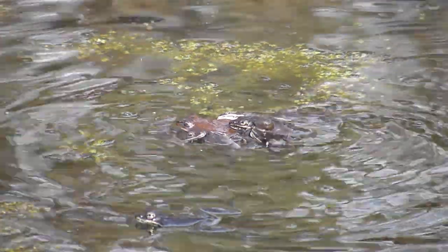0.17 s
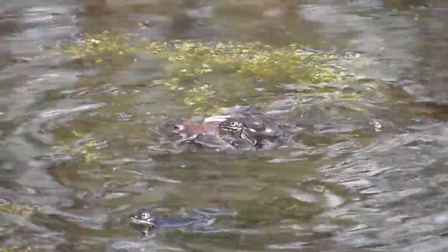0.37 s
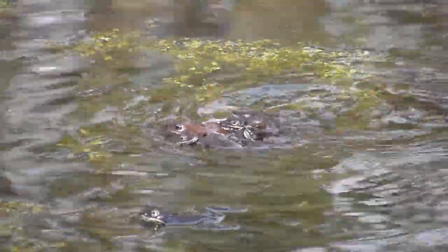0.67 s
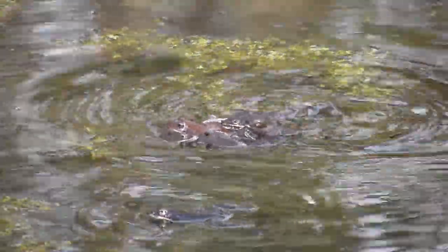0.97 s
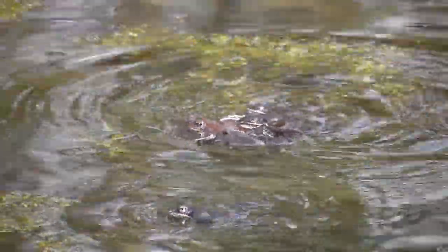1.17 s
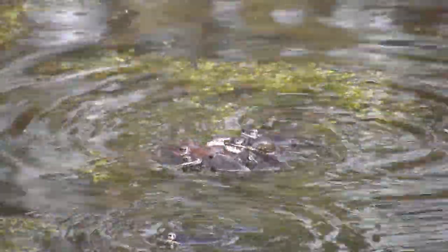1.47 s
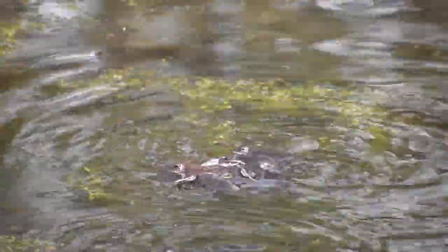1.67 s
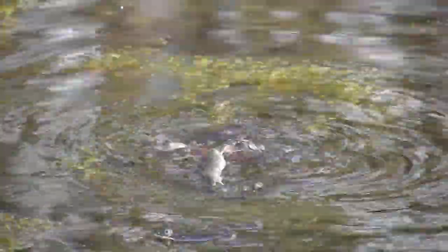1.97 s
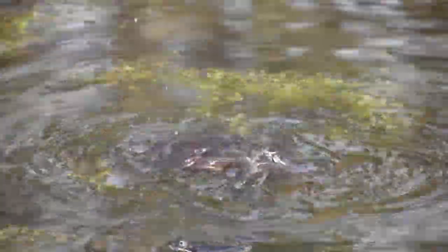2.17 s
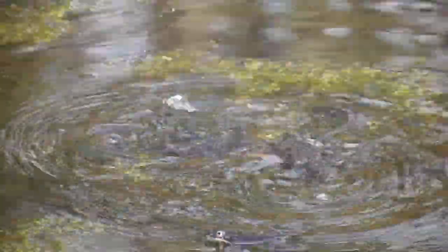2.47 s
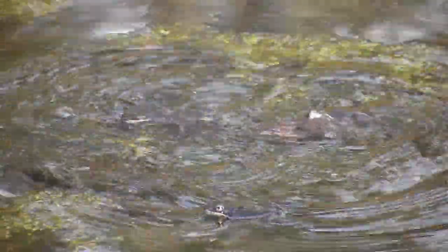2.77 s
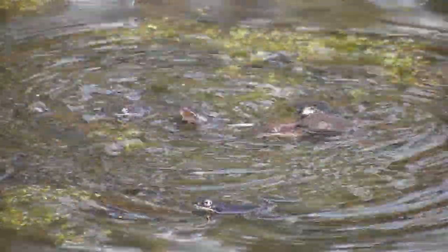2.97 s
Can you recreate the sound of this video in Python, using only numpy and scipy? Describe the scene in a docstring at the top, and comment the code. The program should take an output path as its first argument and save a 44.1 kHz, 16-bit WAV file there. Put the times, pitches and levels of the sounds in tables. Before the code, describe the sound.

After a brief silence a frog chorus cuts in, rapid clucking quacks thinning, clustering densely, then continuing; a faint bird whistles early, one loud click snaps later. Open pond, nearby frogs clear, others distant.

```python
"""Wood frogs quack over one another on a woodland pond: each quack is a short train of vocal pulses,
most often speeding up from slow ticks to a buzz, that rings the throat and swelling vocal sacs.
Farther frogs, weaker and duller, call all along, and filtered noise dying away serves as the woods' echo.
A scuffle adds one snap of decaying sines, two small splashes and soft bumps of noise; a bird whistles
two faint gliding sines, over a steady hiss of coloured noise."""
import sys
import numpy as np
from scipy import signal
from scipy.fft import rfft, irfft
from scipy.io import wavfile

SR = 44100
rng = np.random.default_rng(int(sys.argv[2]) if len(sys.argv) > 2 else 0)


def store_pcm(level_fs):
    """Save levels as 16-bit WAV."""
    pcm = np.round(np.clip(level_fs, -1, 1) * 32767).astype(np.int16)
    wavfile.write(sys.argv[1], SR, np.atleast_2d(pcm).T)


N = 137151

# Near quacks. Each row: loudest moment in seconds, level in dB, rise and fall to half effort in seconds
# (before each ring's own length factor), buzz rate in pulses per second, sac ring in Hz,
# low ring in dB, upper ring in dB and Hz, top ring in dB and Hz; ring levels are relative to the sac ring.
NEAR_QUACKS = [(0.1454, -11.5, 0.007, 0.011, 405, 1556, -6.5, -23.5, 2900, -14.5, 4160),
               (0.197, -24, 0.0058, 0.014, 453, 1840, -5, -11.5, 3100, -13, 4750),
               (0.2726, -18.5, 0.0047, 0.0038, 130, 1480, -1, -18, 3840, -13, 5170),
               (0.3173, -15, 0.007, 0.0057, 420, 1740, -5.5, -15, 2850, -10.5, 5030),
               (0.366, -26.5, 0.016, 0.024, 353, 1526, 0, -16, 3050, -16.5, 5234),
               (0.43, -15, 0.0089, 0.0096, 413, 1430, -4.5, -11.5, 3080, -24, 5070),
               (0.465, -19, 0.018, 0.013, 409, 1232, -4, -11.5, 2300, -17.5, 4600),
               (0.496, -13.5, 0.014, 0.0055, 529, 1650, -14, -17.5, 2580, -24, 4650),
               (0.522, -22, 0.02, 0.011, 268, 1580, 1, -12, 2484, -22, 4730),
               (0.592, -20, 0.016, 0.028, 380, 1480, -6.5, -16.5, 2790, -21, 4600),
               (0.662, -24.5, 0.018, 0.027, 340, 1605, -4.5, -21, 2740, -20, 5430),
               (0.694, -18.5, 0.011, 0.0039, 190, 1660, -0.5, -18, 2900, -10.5, 5050),
               (0.859, -30, 0.013, 0.0087, 388, 1200, 5, -11, 2740, -20, 4770),
               (1.081, -20.5, 0.01, 0.012, 432, 1520, -4.5, -12, 2790, -18, 5570),
               (1.166, -18.5, 0.0079, 0.016, 413, 1620, -9.5, -15, 2890, -18, 4710),
               (1.251, -26, 0.012, 0.0078, 360, 1890, -1.5, -14, 3145, -17.5, 5200),
               (1.297, -21, 0.011, 0.025, 455, 1820, -11, -11, 2980, -15.5, 4720),
               (1.317, -14.5, 0.0092, 0.0085, 376, 1454, -3, -11.5, 2660, -34, 4930),
               (1.401, -18, 0.011, 0.018, 250, 1640, -7, -17, 3620, -19, 5100),
               (1.413, -17.5, 0.011, 0.0074, 540, 1800, -6.5, -7, 3220, -31, 3970),
               (1.459, -13.5, 0.0095, 0.018, 412, 1800, -9, -7.5, 3390, -21.5, 5200),
               (1.482, -14, 0.0099, 0.0058, 472, 1630, -9.5, -6.5, 2500, -26.5, 4800),
               (1.499, -17.5, 0.025, 0.029, 327, 1670, -9.5, -17, 3260, -24, 5460),
               (1.516, -12.5, 0.0022, 0.01, 370, 1650, -2, -9, 2910, -17, 5080),
               (1.5688, -26.5, 0.00082, 0.005, 198, 1450, -2, 3.5, 3080, -30, 4000),
               (1.647, -22.5, 0.014, 0.0047, 380, 1566, -6, -12, 2700, -21, 5200),
               (1.707, -33, 0.011, 0.0061, 372, 1200, 9.5, -44, 3080, -52, 4930),
               (1.798, -25, 0.0059, 0.019, 420, 1677, -16.5, -45, 3050, -10, 4880),
               (1.857, -12.5, 0.017, 0.0092, 404, 1614, -20, -12.5, 2470, -24.5, 4900),
               (1.893, -18.5, 0.016, 0.015, 390, 1570, -12, -13, 2790, -28, 5100),
               (1.977, -23.5, 0.015, 0.0026, 390, 1540, -6.5, -24.5, 2550, -24, 4810),
               (2.039, -17, 0.007, 0.012, 366, 1680, -13.5, -15.5, 2797, -20, 4500),
               (2.155, -16, 0.0035, 0.014, 350, 1770, -9.5, -16, 3080, -17.5, 4820),
               (2.206, -17, 0.0082, 0.011, 454, 1610, -11, -30, 3100, -15.5, 4300),
               (2.234, -23.5, 0.0073, 0.025, 340, 1476, -4.5, -10, 2890, -11, 5230),
               (2.28, -23, 0.018, 0.013, 420, 1553, -3.5, -21, 3000, -14, 4825),
               (2.324, -19, 0.0081, 0.0055, 432, 1445, -14, -57, 2670, -44, 4200),
               (2.425, -28, 0.007, 0.003, 530, 1540, -26, -17, 3180, -25, 4430),
               (2.467, -23, 0.0043, 0.016, 165, 1526, -30, -15, 3000, -34, 4800),
               (2.503, -18.5, 0.009, 0.013, 330, 1682, -8.5, -27, 2600, -19, 4430),
               (2.53, -12, 0.0079, 0.0085, 230, 1600, -7.5, -26, 2880, -21, 5020),
               (2.583, -22, 0.015, 0.01, 460, 1550, -6.5, -16, 2620, -22, 4700),
               (2.613, -19, 0.0071, 0.011, 380, 1720, -7, -13.5, 2960, -19, 5100),
               (2.67, -18, 0.011, 0.0081, 423, 1310, -5, -17, 2630, -18.5, 4900),
               (2.707, -21.5, 0.017, 0.022, 400, 1524, -12, -22.5, 3300, -29, 5300),
               (2.75, -10.5, 0.006, 0.0064, 520, 1504, -12, -21, 2420, -20, 5150),
               (2.837, -15, 0.0055, 0.0092, 384, 1540, -15.5, -15.5, 2600, -22, 4830),
               (2.984, -25, 0.03, 0.02, 300, 1534, -4.5, -15, 2890, -15, 4540),
               (3.01, -16, 0.013, 0.0077, 416, 1370, -7.5, -18.5, 2480, -25, 5070)]
# Resonances of throat and sacs: low, middle, sac, upper, top and a broad rasp. Each row: width in Hz,
# sinking of log pitch per unit of filling, lead in seconds, length relative to the quack.
VOICE_RINGS = [(266, 0.059, 0.003, 1.19), (417, 0.15, 0.0027, 0.9), (505, 0.073, 0.0017, 1.41),
               (483, 0.14, 0.0047, 1.34), (433, 0.029, 0.0072, 1.5), (3370, .04, 0.0016, 1.17)]
# Spectrum of the background air. Each row: frequency in Hz, relative density in dB per Hz.
AIR_SPECTRUM = [(40, -38.5), (300, -18), (520, -12.5), (760, -5), (1550, -10), (2150, -19.5), (4900, -26.5),
                (7000, -35), (15500, -36)]
# Ringing modes of the snap. Each row: frequency in Hz, relative level in dB, 60 dB decay time in seconds.
SNAP_RINGS = [(434, -22.5, 0.0068), (7460, -5.5, 0.0027), (9400, 0, 0.0039), (11600, 2, 0.0021)]
# Splashes. Each row: loudest moment in seconds, time to half amplitude in seconds, level in dB, spray in Hz.
SPRAYS = [(1.8, 0.032, -52, 8700), (2.041, 0.04, -49, 10400)]
# Soft low bumps. Each row: loudest moment in seconds, level in dB.
SOFT_BUMPS = [(.24, -56), (.53, -63), (.78, -62), (0.83, -60), (1.2, -63), (1.3, -63)]
# Band of the bumps: its lower and upper edge in Hz.
BUMP_BAND_HZ = [95, 175]
# Bird notes: the moments in seconds at which each held pitch begins to fall.
WHISTLE_FALLS_S = [.48, .98]

# Pulses: ticks per s before the buzz, time constant of a rate change, fall of log rate per unit of filling
SLOW_RATE, SPEED_UP_S, SAG = 185, .001, .07
JITTER, SHIMMER_DB = .035, 2  # random spread of pulse timing (in cycles) and of pulse level
STOP = 2.1  # the pulses stop this many fall times after the loudest moment
OPEN_S, CLOSED_SHARE = .0005, .45  # how fast the gated rings jump up, and their share before that
KNOCK_DB, KNOCK_S = 3, .0018  # brief boost as the buzz begins, and its time to half the dB boost
LOW_HZ, LOW_SPREAD = 826, 0.04  # shared low ring and its random spread in log pitch
MID_RATIO, MID_DB = 0.83, -2.5  # the middle ring follows the sac ring
RASP_HZ, RASP_DB = 3160, 0.5  # rasp of the pulse edges; its level is counted from the top ring
# A small body radiates little below this pitch, or above this multiple of its top ring
VOICE_LOW_HZ, VOICE_TOP_RATIO = 525, 1.38
FAR_PER_S, FAR_DB, FAR_SPREAD_DB, FAR_DULL_DB = 30, -32, 2, -1.5
WOODS_T60_S, WOODS_DB, FAR_WOODS_DB, WOODS_HZ = 0.45, -18, -10, 3900
SNAP_S, SNAP_DB, SNAP_LOW_HZ, SNAP_RISE_S = 1.8354, 3, 267, 0.00023
WHISTLE_HZ, WHISTLE_DB, WHISTLE_FALL_HZ_PER_S = 2480, -39, 3000
WHISTLE_HALF_S, WHISTLE_LEAD_S = .085, .025  # time to half amplitude; loudest this long before the fall
AIR_DB = -41
START_S, TOP_HZ = .136, 16100  # the sound cuts in here; steep upper limit


def undb(db):
    """Amplitude gain is ten to the power of dB over 20."""
    return 10 ** (np.asarray(db) / 20)


def unit(x):
    """Normalisation divides a signal by its root mean square."""
    return x / np.sqrt(np.mean(x ** 2))


def add(out, x, at_s):
    """Superposition: a sound is summed in from a given time on."""
    first = int(at_s * SR)
    start, end = max(first, 0), min(first + len(x), N)
    if end > start:
        out[start:end] += x[start - first:end - first]


def band(x, hz, kind, order=2):
    """A Butterworth filter passes its band with maximal flatness."""
    edges = np.minimum(hz, SR / 2 - 1)
    return signal.sosfilt(signal.butter(order, edges, kind, fs=SR, output="sos"), x)


def swell(t, half_s):
    """A Gaussian envelope halves at half_s on either side of time zero."""
    return .5 ** ((t / half_s) ** 2)


def step(t, within_s):
    """A logistic switch passes smoothly from 0 to 1 around time zero."""
    return (1 + np.tanh(t / within_s / 2)) / 2


def die_away(t, t60):
    """Exponential decay loses 60 dB, a factor of 1000, in t60 seconds."""
    return np.exp(-np.log(1000) * t / t60)


def air():
    """Spectral shaping of white noise: the blur of the farthest chorus and a faint steady hiss."""
    hz, db = np.array(AIR_SPECTRUM).T
    bin_hz = np.arange(N // 2 + 1) * SR / N
    colour = undb(np.interp(np.log(bin_hz + 1), np.log(hz), db))
    return undb(AIR_DB) * unit(irfft(rfft(rng.standard_normal(N)) * colour, N))


def woods(x):
    """Diffuse reverberation: convolution with decaying dull noise, as from bank and trunks."""
    t = np.arange(SR) / SR
    echo = band(rng.standard_normal(SR), WOODS_HZ, "low") * die_away(t, WOODS_T60_S)
    return signal.fftconvolve(x, echo / np.linalg.norm(echo))[:N]


def bird(t):
    """Frequency modulation of a pure tone: each distant note is held, then slurred down."""
    out = 0
    for at in WHISTLE_FALLS_S:
        hz = WHISTLE_HZ - WHISTLE_FALL_HZ_PER_S * np.maximum(t - at, 0)
        tone = np.sin(2 * np.pi * np.cumsum(hz) / SR)
        out = out + undb(WHISTLE_DB) * swell(t - at + WHISTLE_LEAD_S, WHISTLE_HALF_S) * tone
    return out


def snap(t):
    """Modal ringing: an abrupt start sets off a few quickly damped sines."""
    u = np.maximum(t - SNAP_S, 0)
    out = 0
    for hz, db, t60 in SNAP_RINGS:
        out = out + undb(SNAP_DB + db) * np.sin(2 * np.pi * hz * u) * die_away(u, t60)
    return band(out * (1 - np.exp(-u / SNAP_RISE_S)), SNAP_LOW_HZ, "high")


def splashes(t):
    """Impulsive noise: samples of widely uneven strength, band-limited, make a fine spray of droplets."""
    out = 0
    for at, half, db, hz in SPRAYS:
        drops = rng.standard_normal(N) * undb(4.64 * rng.exponential(size=N))
        spray = unit(band(drops, [hz / 1.27, hz * 1.12], "band"))
        out = out + undb(db) * swell(t - at, half) * spray
    return out


def bumps(t):
    """Amplitude modulation: short swells of band-passed low rumble are heard as soft bumps."""
    rumble = unit(band(rng.standard_normal(N), BUMP_BAND_HZ, "band"))
    return rumble * sum(undb(db) * swell(t - at, 0.016) for at, db in SOFT_BUMPS)


def scuffle(t):
    """Superposition of one bright snap, two small splashes and a few soft bumps."""
    return snap(t) + splashes(t) + bumps(t)


def ring(x, hz, width_hz):
    """Resonance by a double pole: shift a gliding centre to zero, smooth, and shift back."""
    turn = np.exp(2j * np.pi * np.cumsum(hz) / SR)
    q = np.exp(-np.pi * width_hz / SR)
    smooth = signal.lfilter([1], [1, -2 * q, q * q], x / turn)
    return np.e * (1 - q) * (turn * smooth).imag


def pulse_train(u, rise, fall, rate, filling):
    """Phase accumulation: a pulse falls near each whole cycle as ticks pass to a buzz that stops short."""
    buzz_rate = rate * np.exp(-SAG * filling)
    rate_now = SLOW_RATE + (buzz_rate - SLOW_RATE) * step(u + .65 * rise, SPEED_UP_S)
    cycles = np.cumsum(rate_now) / SR
    cycles -= cycles[len(u) // 2]
    k = np.arange(np.ceil(cycles[0]), cycles[-1])
    chance = rng.standard_normal(size=(256, 2))[k.astype(int)]
    places = np.interp(k + JITTER * chance[:, 0], cycles, np.arange(len(u))).astype(int)
    pulses = np.zeros(len(u))
    pulses[places] = undb(SHIMMER_DB * chance[:, 1])
    return pulses * (1 - step(u - STOP * fall, SPEED_UP_S))


def quack(rise, fall, rate, sac_hz, low_db, upper_db, upper_hz, top_db, top_hz):
    """Source and filter: 0.2 s of pulses, loudest near the middle, excite rings that sink as the sacs fill."""
    u = np.arange(-SR // 10, SR // 10) / SR
    filling = 2 * np.tanh(u / (rise + fall) / 2)  # from -2 to 2; short quacks sweep faster
    pulses = pulse_train(u, rise, fall, rate, filling)
    # the lower rings and the rasp jump up as the buzz begins, with a brief knock
    opening = CLOSED_SHARE + (1 - CLOSED_SHARE) * step(u + 1.05 * rise, OPEN_S)
    opening = opening * undb(KNOCK_DB * swell(u + 0.88 * rise, KNOCK_S))
    low_hz = LOW_HZ * np.exp(LOW_SPREAD * rng.standard_normal())  # differs a little from call to call
    voices = [(low_hz, low_db, opening), (MID_RATIO * sac_hz, MID_DB, opening), (sac_hz, 0, opening),
              (upper_hz, upper_db, 1), (top_hz, top_db, 1), (RASP_HZ, top_db + RASP_DB, opening)]
    out = 0
    sign = 1  # neighbouring rings alternate in polarity
    for (hz, db, gate), (width, sink, lead, length) in zip(voices, VOICE_RINGS):
        v = u + lead
        half_s = np.where(v < 0, rise, fall)
        effort = gate * .5 ** (np.abs(v / length / half_s) ** 1.44)
        gain = sign * undb(db) * np.sqrt(width / VOICE_RINGS[2][0])  # widths compared with the sac ring
        out = out + gain * ring(pulses * effort, hz * np.exp(-sink * filling), width)
        sign = -sign
    out = band(out, VOICE_LOW_HZ, "high", order=3)
    return band(out, VOICE_TOP_RATIO * top_hz, "low", order=4)


def far_frogs():
    """Distance weakens and dulls: the same kinds of voice call at random moments."""
    out = np.zeros(N)
    for j in range(int(FAR_PER_S * N / SR)):
        row = NEAR_QUACKS[rng.integers(len(NEAR_QUACKS))]
        _, _, rise, fall, rate, sac_hz, low_db, upper_db, upper_hz, top_db, top_hz = row
        call = quack(rise, fall, rate, sac_hz, low_db, upper_db + FAR_DULL_DB, upper_hz,
                     top_db + 2 * FAR_DULL_DB, top_hz)
        gain = undb(FAR_DB + FAR_SPREAD_DB * rng.standard_normal())
        at = (j + rng.random()) / FAR_PER_S
        add(out, gain * call, at - len(call) / 2 / SR)
    return out


def near_frogs():
    """Superposition of the quacks that stand out, each centred on its loudest moment."""
    out = np.zeros(N)
    for at, db, *voice in NEAR_QUACKS:
        call = quack(*voice)
        add(out, undb(db) * call, at - len(call) / 2 / SR)
    return out


def scene():
    """Linear mixing of near and far frogs, bird, their echo, the scuffle and the air."""
    t = np.arange(N) / SR
    near = near_frogs()
    far = far_frogs() + bird(t)
    echo = woods(undb(WOODS_DB) * near + undb(FAR_WOODS_DB) * far)
    return (near + far + echo + scuffle(t) + air())[None]


def record(dry):
    """Gating and low-pass filtering: silence until the sound cuts in, and a steep cut of the top."""
    live = np.clip((np.arange(N) / SR - START_S) / .004, 0, 1)  # opens over 4 ms
    top_cut = signal.ellip(10, .1, 80, TOP_HZ, fs=SR, output="sos")
    return signal.sosfilt(top_cut, dry * live)


dry = scene()
out = record(dry)
store_pcm(out)
```